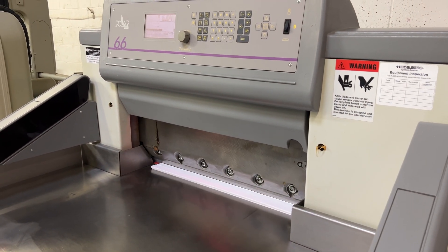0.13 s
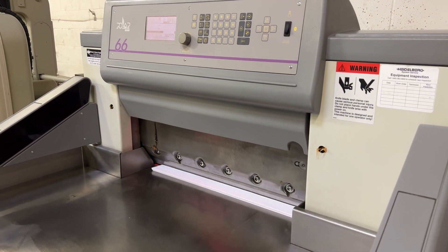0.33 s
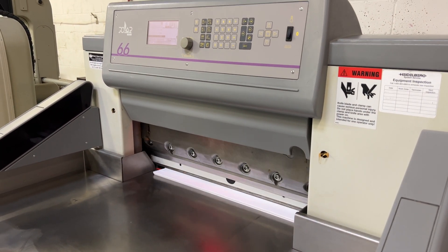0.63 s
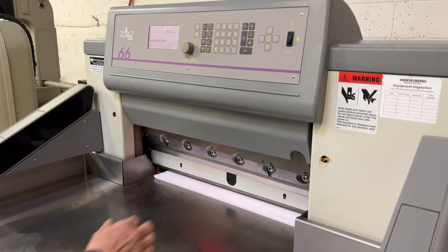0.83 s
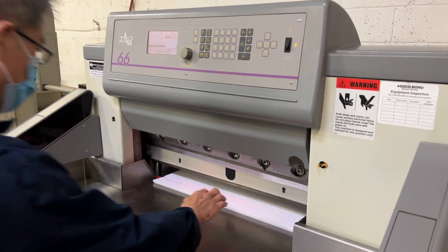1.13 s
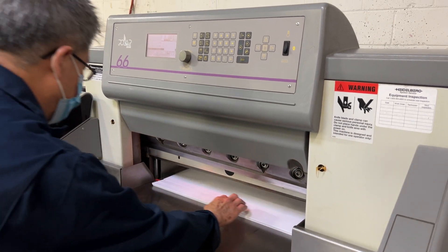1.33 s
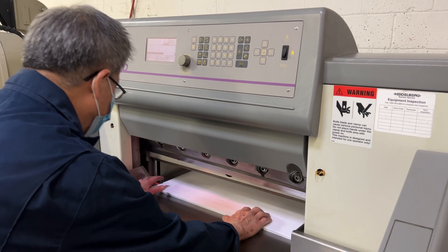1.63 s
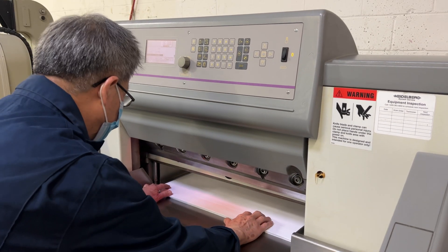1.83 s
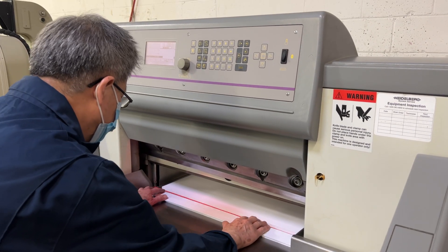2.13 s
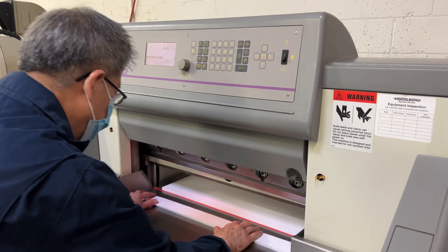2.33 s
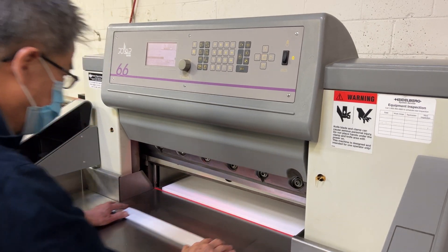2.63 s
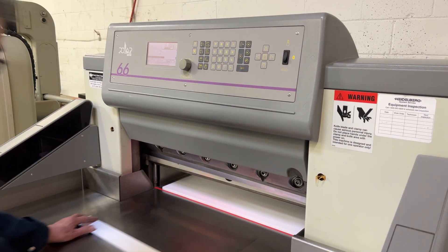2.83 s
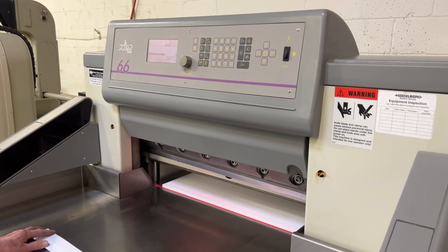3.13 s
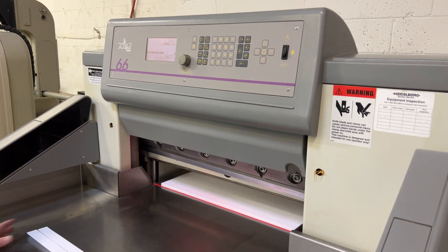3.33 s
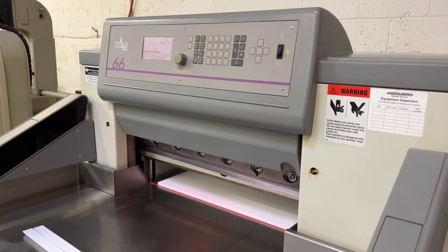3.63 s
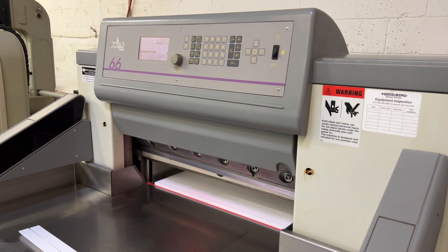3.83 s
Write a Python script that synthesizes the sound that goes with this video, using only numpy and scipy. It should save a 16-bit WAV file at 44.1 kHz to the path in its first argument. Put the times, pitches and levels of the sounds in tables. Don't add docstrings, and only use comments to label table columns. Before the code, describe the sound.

A hydraulic paper cutter slams at once, close and slightly left, plates rattling and oil hissing; then motor hum, a brief chatter, hand knocks and soft paper slides in a reverberant workshop, on a stereo phone.

```python
import sys
import numpy as np
from scipy import signal
from scipy.fft import rfft, irfft, next_fast_len
from scipy.io import wavfile
from scipy.ndimage import uniform_filter1d

SR = 44100
rng = np.random.default_rng(int(sys.argv[2]) if len(sys.argv) > 2 else 0)


def unload_audio(sound):
    columns = np.transpose(np.atleast_2d(sound))
    steps = np.round(np.clip(columns, -1, 1) * 32767)
    wavfile.write(sys.argv[1], SR, steps.astype(np.int16))


def volts_from_decibels(level):
    exponent = np.asarray(level, float) / 20
    return 10 ** exponent


N = 176400


def noise():
    return rng.standard_normal(N)


def evened(x):
    return x / np.sqrt(np.mean(x ** 2) + 1e-20)


def read(points, hz):
    f, value = np.transpose(points)
    return np.interp(np.log(hz + 1), np.log(f + 1), value)


def level(curve):
    s, db = np.transpose(curve)
    before = -150 if s[0] > 0.05 else db[0]
    return volts_from_decibels(np.interp(np.arange(N) / SR, s, db, left=before, right=-150))


def puff_shape(t, centre_s, length_s):
    return np.exp(-2 * ((t - centre_s) / length_s) ** 2)


def colour(x, points):
    size = next_fast_len(len(x) + 4096, True)
    gain = volts_from_decibels(read(points, np.fft.rfftfreq(size, 1 / SR)))
    return irfft(rfft(x, size) * gain, size)[:len(x)]


def resonate(x, hz, width):
    turn = np.exp(2j * np.pi * np.cumsum(hz * np.ones(len(x))) / SR)
    r = np.exp(-np.pi * width / SR)
    return 2 * (turn * signal.lfilter([1 - r], [1, -r], x / turn)).real


def drift(rate):
    smooth = uniform_filter1d(noise(), size=200)
    return evened(signal.lfilter([1], [1, -np.exp(-2 * np.pi * rate / SR)], smooth))


def diffuse(size, field_db):
    # (frequency [Hz], correlation [0..1])
    likeness = [(60, .99), (160, .96), (270, .85), (450, .55), (740, 0), (16000, 0)]
    frames, hz = size // 256 + 5, np.fft.rfftfreq(1024, 1 / SR)
    a, b, c, d = rng.standard_normal((frames, 513, 4)).T
    same = np.clip(read(likeness, hz), 0, 1)[:, None]
    left = a + 1j * b
    right = same * left + np.sqrt(1 - same ** 2) * (c + 1j * d)
    gain = volts_from_decibels(field_db(hz[:, None], np.arange(frames) * 256 / SR))
    return signal.istft(np.array([left, right]) * gain, nperseg=1024, noverlap=768)[1][:, :size]


def lean(pair, points):
    left = colour(pair[0], [(f, db / 2) for f, db in points])
    right = colour(pair[1], [(f, -db / 2) for f, db in points])
    return np.array([left, right])


def struck(blows, modes):
    # (frequency [Hz], level [dB])
    crack_colour = [(300, 28), (1000, 12.5), (2500, 4.5), (5000, -6), (7000, -26), (12000, -38)]
    cluster_spread = 0.09
    part_db_per_octave = 10
    out, t = np.zeros(N + SR), np.arange(SR // 3) / SR
    hz, mode_db, t60 = np.repeat(modes, 4, axis=0).T[:, :, None]
    spots = rng.standard_normal((len(blows), 3, len(hz), 1))
    fade_out = np.cos(np.pi * t / t[-1] / 2)
    rise = 1 - np.exp(-t / 0.0015)
    crack_fall = np.exp(-t / 0.002) + volts_from_decibels(-9) * np.exp(-t / 0.014)
    for (s, db, ms, crack_db, part_hz), (a, b, c) in zip(blows, spots):
        distance_db = part_db_per_octave * abs(np.log2(hz / part_hz))
        strength = volts_from_decibels(mode_db + 2 * a - distance_db - 60 * t / t60) * np.sign(c + 0.5)
        tones = strength * np.sin(2 * np.pi * hz * (1 + cluster_spread * b) * t)
        ring = tones.sum(axis=0) * fade_out * rise
        push = np.hanning(max(int(ms * SR / 1000), 3) + 2)
        ring = signal.oaconvolve(ring, push / push.sum())[:len(t)]
        crack = evened(colour(rng.standard_normal(len(t)), crack_colour)) * crack_fall
        at = round(s * SR)
        out[at:at + len(t)] += volts_from_decibels(db) * 0.25 * ring + volts_from_decibels(crack_db) * crack
    return out[:N]


def slam():
    # (time [s], level [dB], contact [ms], crack [dB], pitch of the part struck [Hz])
    blows = [(.0345, 0, 0.73, -15, 590), (.04, -5, 0.51, -15, 253), (.057, -8.5, 0.22, -16, 474),
             (.07, -10, 0.5, -30, 480), (.083, -9.5, 0.43, -19, 536), (.099, -8, 2.1, -51, 220),
             (.15, -23.5, 0.85, -50, 450), (.193, -10, 1.1, -40, 214), (.236, -26, 1.7, -39, 596),
             (.2513, -17, 0.13, -24.5, 1090), (.262, -14.5, 0.72, -50, 480), (.273, -13, 4.6, -53, 232),
             (.33, -17.5, 5.3, -60, 112)]
    # (frequency [Hz], level [dB], t60 [s])
    frame = [(79, -16, 0.2), (112, -3, 1), (140, 6, 0.17), (189, 2.5, 0.17), (224.7, 4.5, 0.25),
             (289, 4.5, 0.093), (363, -1.5, 0.09), (456.5, 5, 0.064), (572.5, -2, 0.065), (664, 5, 0.034),
             (800, 1, 0.05), (1234, 3.5, 0.05), (1780, -18, .06), (2610, -27, 0.057)]
    return struck(blows, frame)


def rattle():
    # (time [s], level [dB], pitch [Hz])
    clatters = [(.005, -26.5, 1670), (0.0277, -22.5, 1580), (0.032, -26, 1780), (.034, -27, 2860),
                (0.036, -34, 2200), (0.043, -34, 2800), (.047, -27.5, 2160), (.056, -35, 2600),
                (.06, -35, 3470), (0.065, -29.5, 1730), (.072, -27, 1720), (.076, -35, 2900),
                (0.079, -42, 3200), (.086, -37, 2400), (.091, -32, 1980), (0.178, -51, 3200),
                (0.229, -43, 2780), (.238, -37.5, 2180), (0.24, -38, 4770), (.244, -35, 1580),
                (.25, -24.5, 1480), (0.2528, -28.5, 2370), (.255, -31, 1510), (.26, -42, 1740),
                (.271, -39, 2200), (.274, -41, 2530), (0.28, -41, 1860)]
    out, t = np.zeros(N), np.arange(800) / SR
    shape = (1 - np.exp(-t / 0.0005)) * np.exp(-t / 0.0022)
    for s, db, hz in clatters:
        width = 0.55 * hz
        ring = resonate(resonate(rng.standard_normal(len(t)), hz, width), hz, width)
        out[round(s * SR):][:len(t)] += volts_from_decibels(db) * 0.5 * evened(ring * shape)
    return out


def groan():
    # (frequency [Hz], width [Hz], level [dB])
    resonances = [(1640, 150, -30), (2170, 200, -38), (2840, 200, -38)]
    end_s, swell_db, t60 = 0.033, 3, 0.04
    t, slips = np.arange(N) / SR, noise()
    fall_db = np.maximum(-60 * (t - end_s) / t60, -200)
    shape = volts_from_decibels(np.where(t < end_s, swell_db * (t / end_s - 1), fall_db))
    tone = volts_from_decibels(-20) * np.sqrt(2) * np.sin(2 * np.pi * 345.6 * t)
    scrape = sum(volts_from_decibels(db) * evened(resonate(resonate(slips, hz, w), hz, 2 * w)) for hz, w, db in resonances)
    return shape * (tone + scrape)


def oil_hiss():
    # (time [s], level [dB])
    flow = [(0.0, -37.5), (0.082, -39), (0.108, -47), (0.184, -43.5), (0.194, -39), (0.22, -49),
            (0.256, -43), (0.314, -86), (0.75, -94)]
    # (frequency [Hz], level [dB])
    hiss_colour = [(400, -57), (700, 6), (1750, -19), (3900, -13.5), (7000, -17), (8400, -10.5),
                   (11500, -17), (16000, -20)]
    return evened(colour(noise(), hiss_colour)) * volts_from_decibels(7 + 1.44 * drift(47)) * level(flow)


def valve_squeal():
    # (time [s], level [dB])
    squeal_curve = [(.09, -75), (.13, -54), (.18, -52), (.25, -54), (.28, -63), (.305, -53), (.36, -59),
                    (.49, -65), (.56, -76)]
    # (frequency [Hz], width [Hz], level [dB])
    partials = [(2990, 60, -10), (3150, 100, -12), (5600, 18, -2), (5740, 22, -5), (5950, 90, -13)]
    sag = 0.065 * np.minimum(np.arange(N) / SR, 1)
    bend = 1 + 0.0028 * drift(6.7) - sag
    squeal = np.zeros(N)
    for hz, w, db in partials:
        squeal += volts_from_decibels(db) * evened(resonate(resonate(noise(), hz * bend, w), hz * bend, 2 * w))
    return squeal * level(squeal_curve) * volts_from_decibels(1.3 * drift(25))


def whistles():
    # (centre [s], length [s], level [dB], frequency [Hz], width [Hz])
    puffs = [(.075, .02, -52, 8300, 300), (.195, .015, -48, 8150, 250), (.56, .1, -64, 11200, 700),
             (.15, .17, -58, 10000, 600), (.56, .1, -67, 2890, 90), (3.47, .07, -64, 15200, 900),
             (1.53, .08, -66, 6000, 1500), (3.09, .05, -64, 11500, 1200)]
    t, out = np.arange(N) / SR, np.zeros(N)
    for s, d, db, hz, w in puffs:
        out += volts_from_decibels(db) * puff_shape(t, s, d) * evened(resonate(resonate(noise(), hz, w), hz, w))
    return out


def coast():
    # (frequency [Hz], width [Hz])
    hollows = [(335, 50), (400, 150)]
    swell = puff_shape(np.arange(N) / SR, 0.85, 0.45)
    return volts_from_decibels(-49) * swell * sum(evened(resonate(noise(), hz, w)) for hz, w in hollows)


def chatter():
    # (start [s], length [s], level [dB])
    bursts = [
        (1.0865, .075, -57.5),
        (1.1685, .08, -57.5),
    ]
    # (frequency [Hz], width [Hz], level [dB])
    clamp = [(1600, 300, -2), (2200, 300, -5), (2950, 260, 2), (4850, 400, -2), (7800, 1800, -4),
             (11000, 1800, -8)]
    slips_per_s, slip_s = 97, 0.0045
    t, slips = np.arange(N) / SR, np.zeros(N)
    for s, d, db in bursts:
        turns = (t - s) * slips_per_s
        which = np.clip(turns, 0, 39).astype(int)
        strength_db = 1.2 * rng.standard_normal(40)[which] - 4 * (t - s) / d
        active = (t > s) & (t < s + d)
        fall = np.exp(-(turns % 1) / slips_per_s / slip_s)
        slips += active * volts_from_decibels(db + np.clip(strength_db, -20, 6)) * 2 * fall
    slips = slips * noise()
    return sum(volts_from_decibels(db) * resonate(slips, hz, w) * np.sqrt(SR / (np.pi * w) / 2) for hz, w, db in clamp)


def hand_knocks():
    # (time [s], level [dB], contact [ms], crack [dB], pitch of the part struck [Hz])
    taps = [
        (1.4905, -25, 0.34, -37, 990),
        (1.494, -31, 0.14, -40, 1800),
        (1.5, -21.5, 0.26, -29, 430),
        (1.508, -22.5, 0.2, -39, 610),
        (1.524, -22, 0.55, -31, 694),
        (1.54, -28, 0.81, -50, 450),
        (1.578, -36, 0.34, -72, 800),
        (1.6, -21, 4.8, -76, 140),
    ]
    # (frequency [Hz], level [dB], t60 [s])
    table_modes = [(150, 2, 0.04), (289, 5, 0.17), (414, 3, 0.054), (461, 5, 0.072), (640, -0.5, 0.035),
                   (761, 9, 0.061), (890, 7, 0.035), (1170, 7, 0.045), (1500, 1, 0.14), (1790, 4.5, 0.043),
                   (2253, 3, 0.052)]
    return struck(taps, table_modes)


def paper():
    # (time [s], level [dB])
    slide = [(2.1, -70), (2.638, -54.5), (3.102, -49), (3.178, -80), (3.196, -79), (3.254, -95),
             (3.476, -54), (3.646, -98), (3.7, -103)]
    # (centre [s], length [s], level [dB])
    brushes = [
        (1.43, 0.024, -55.5),
        (1.598, .2, -68),
        (1.81, .002, -55),
        (3.21, .002, -66),
        (3.8, .06, -75),
    ]
    # (frequency [Hz], level [dB])
    paper_colour = [(2000, -24), (4000, 6), (6500, -0.5), (8500, 9.5), (12000, 2), (15500, 5.5), (16000, 9)]
    t = np.arange(N) / SR
    stroke = volts_from_decibels(-3) * level(slide)
    stroke = stroke + sum(volts_from_decibels(db) * puff_shape(t, s, d) for s, d, db in brushes)
    grain = noise() * volts_from_decibels(-2 * drift(150))
    return evened(colour(grain, paper_colour)) * stroke


def room(x):
    # (frequency [Hz], t60 [s])
    decay = [(60, 3.3), (200, 1.3), (500, 1.02), (2000, 0.85), (8000, 0.8)]
    tail = diffuse(2 * SR, lambda hz, t: -60 * t / read(decay, hz))
    tail = tail * np.clip(np.arange(2 * SR) / SR / 0.0084, 0, 1)
    return signal.fftconvolve(x[None], tail / np.linalg.norm(tail[0]), axes=1)[:, :N]


def motor():
    # (frequency [Hz], level [dB rms])
    lines = [(56.3, -50), (73.9, -47), (120, -40.5), (147, -49), (220, -53), (240, -45.5), (328, -55),
             (360, -56)]
    out = np.zeros(N)
    for hz, db in lines:
        strength = volts_from_decibels(db) * np.sqrt(2) * (1 + 0.15 * drift(3.8))
        cycles = np.cumsum(hz * (1 + 0.001 * drift(1.65))) / SR + rng.random()
        out += strength * np.sin(2 * np.pi * cycles)
    return out


def shop():
    # (frequency [Hz], level [dB])
    shop_colour = [(20, -45), (42, -6), (60, -6.5), (120, -1), (300, -9), (600, -14), (2000, -24),
                   (4000, -36.5), (9000, -38.5), (16000, -72.5)]
    # (frequency [Hz], left minus right [dB])
    shop_side = [(60, 4), (180, 6), (500, 4), (6000, 6), (8500, -3)]

    def field_db(hz, t):
        patches = rng.standard_normal((len(t), len(hz)))
        patches = uniform_filter1d(uniform_filter1d(patches, size=12, axis=0), size=10, axis=1)
        lull_db = -4.5 * puff_shape(t, 0.87, 0.21) * hz / (hz + 600)
        swell_db = 0.3 * np.interp(t, np.arange(N) / SR, drift(2))
        return read(shop_colour, hz) + lull_db + 1 * evened(patches).T + swell_db

    return volts_from_decibels(-41) * lean(evened(diffuse(N, field_db)), shop_side)


def scene():
    # (frequency [Hz], left minus right [dB])
    machine_side = [(60, 0.5), (180, -1), (500, 5), (6000, 5.5), (8500, -11)]
    machine = slam() + rattle() + groan() + oil_hiss() + valve_squeal() + chatter() + coast()
    knocks = hand_knocks()
    sheets = paper() + whistles()
    near = lean(machine + knocks + room(volts_from_decibels(-6.5) * machine + volts_from_decibels(-6.5) * knocks), machine_side)
    return near + sheets + volts_from_decibels(-10.5) * room(sheets) + motor() + shop()


def roll_off(x):
    return signal.sosfilt(signal.butter(12, 17070, fs=SR, output="sos"), x)


def record(dry):
    # (frequency [Hz], phase [rad])
    port_phase = [(100, 0), (1200, .5), (2500, 1.5), (7900, 1.1), (8600, 0), (9800, -.92 * np.pi),
                  (10500, -1.08 * np.pi), (12000, -2 * np.pi), (13300, -2.9 * np.pi), (14300, -3.1 * np.pi),
                  (15500, -4 * np.pi)]
    # (frequency [Hz], share [0..1])
    port_share = [(6500, 0), (8300, .65), (9600, .93)]
    edge_hz, low_cut_hz, peak = 15760, 44, 0.95
    size = next_fast_len(N + 8192, True)
    hz = np.fft.rfftfreq(size, 1 / SR)
    left, right = rfft(dry, size) * (hz < edge_hz) * hz ** 6 / (hz ** 6 + low_cut_hz ** 6)
    share = read(port_share, hz)
    right = (share * left + (1 - share) * right) * np.exp(-1j * read(port_phase, hz))
    pair = irfft(np.array([left, right]), size)[:, :N]
    return roll_off(peak * np.tanh(pair / peak))


dry = scene()
out = record(dry)
unload_audio(out)
```